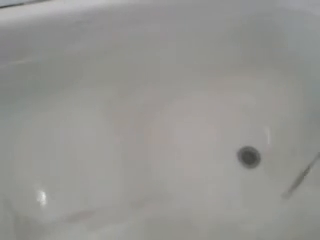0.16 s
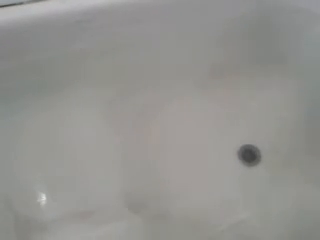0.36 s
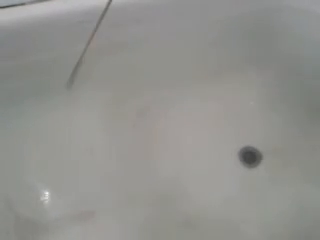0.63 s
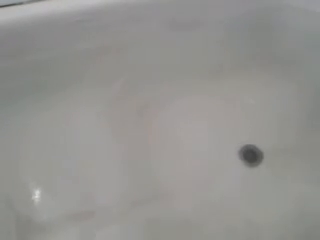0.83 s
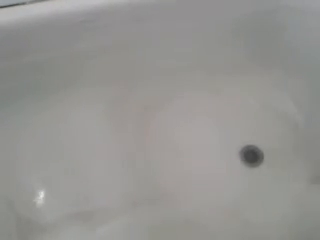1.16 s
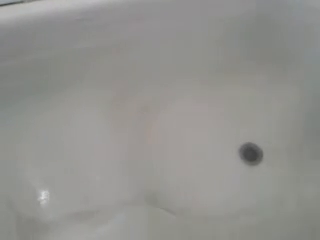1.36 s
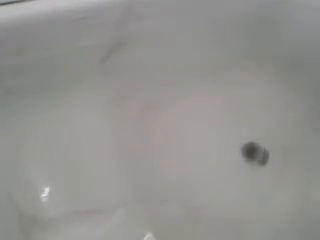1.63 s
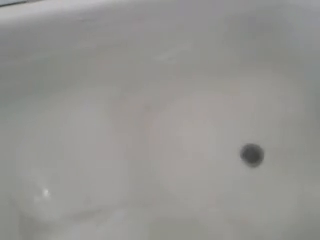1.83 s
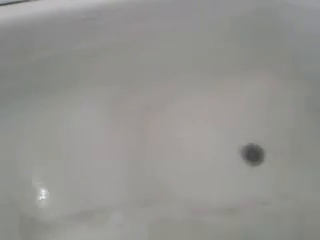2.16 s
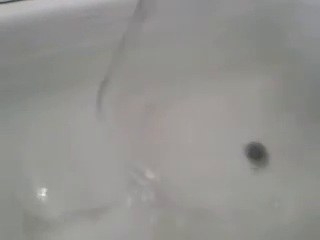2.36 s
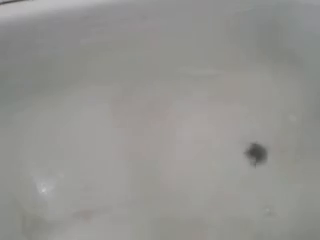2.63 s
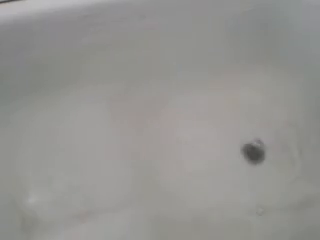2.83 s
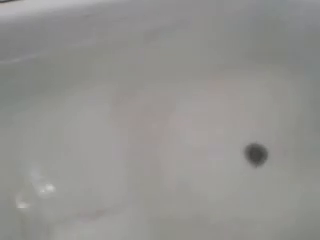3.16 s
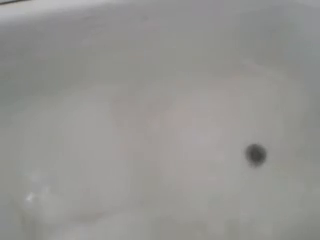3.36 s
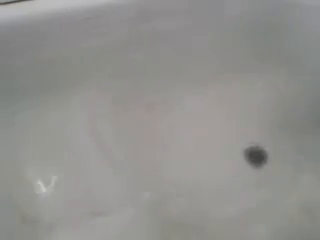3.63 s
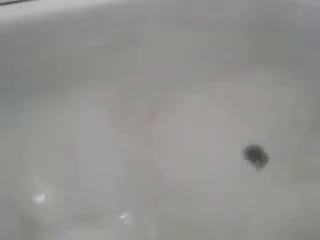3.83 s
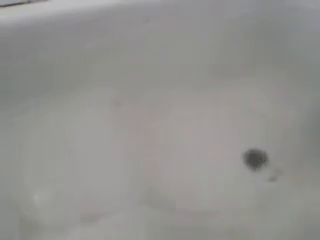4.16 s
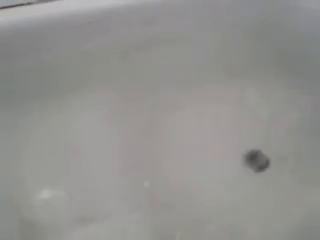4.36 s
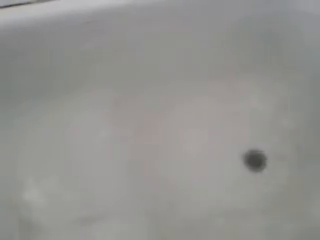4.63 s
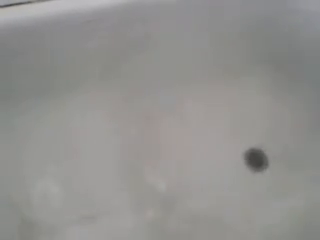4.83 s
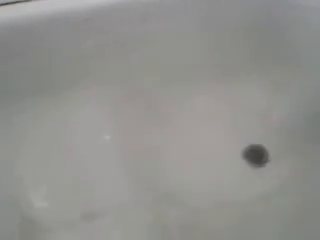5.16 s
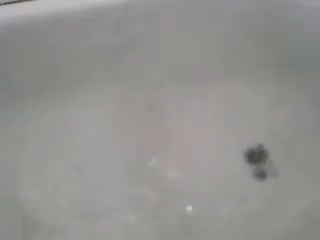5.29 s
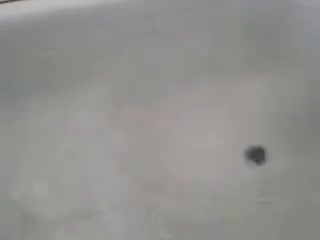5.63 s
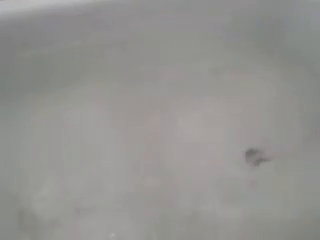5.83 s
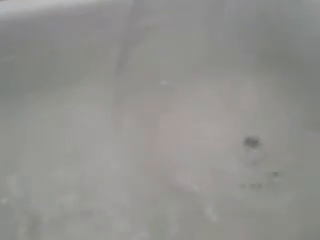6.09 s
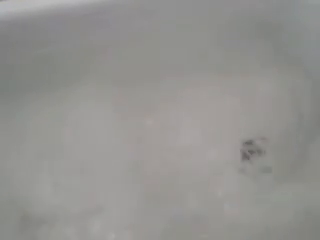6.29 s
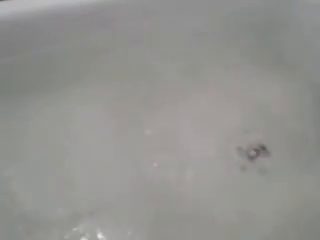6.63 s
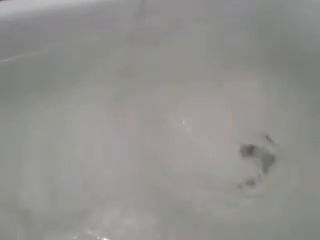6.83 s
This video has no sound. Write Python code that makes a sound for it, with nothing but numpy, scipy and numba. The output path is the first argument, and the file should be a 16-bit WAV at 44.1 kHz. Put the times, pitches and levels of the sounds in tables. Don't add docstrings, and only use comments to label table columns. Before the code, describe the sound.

Almost still bath water at first: sparse high ticks, a low hum through the tub and two short rattly knocks. After about three seconds the drops come more thickly, crisp and bubbly, and by five seconds they become busy splashing with hollow plops and rising gulps. It stays lively to the end. Short hard tub echoes and a tiled-room tail surround it, caught close by a thin, hissy little microphone.

```python
import sys
import numpy as np
from scipy import signal
from scipy.fft import rfft, irfft, next_fast_len
from scipy.io import wavfile
from numba import njit

SR = 44100
rng = np.random.default_rng(int(sys.argv[2]) if len(sys.argv) > 2 else 0)


def store_wav(level_fs):
    pcm = np.round(np.clip(np.atleast_2d(level_fs), -1, 1) * 32767)
    wavfile.write(sys.argv[1], SR, pcm.T.astype(np.int16))


def invert_db(level):
    return 10 ** (np.asarray(level, dtype=float) / 20)


N = 307377

# (time [s], peak level [dB], level of the low thud [dB])
KNOCKS = [
    (.02, -80, -59.5),
    (0.446, -29.5, -52.5),
    (0.691, -26.5, -48.5),
]
# (time [s], stirring level [dB])
STIR = [(0, -68.5), (1.9, -63.5), (2.21, -54.5), (2.45, -64), (3.11, -58.5), (3.7, -47), (3.94, -52),
        (4.2, -44.5), (4.52, -50), (4.72, -43.5), (5.05, -42), (5.279, -36.5), (5.45, -46), (5.589, -38.5),
        (5.92, -45), (6.4, -39), (6.7, -42), (6.97, -36)]


def level(x, db):
    return x * invert_db(db) / np.sqrt(np.mean(x ** 2))


def band(x, lo_hz, hi_hz, order=2):
    return signal.sosfilt(signal.butter(order, [lo_hz, hi_hz], "bandpass", fs=SR, output="sos"), x)


def ring(x, modes, widen=1):
    out = 0
    for hz, width, db in modes:
        b, a = signal.iirpeak(hz, hz / width / widen, fs=SR)
        out = out + invert_db(db) * np.sqrt(50 / width) * signal.lfilter(b, a, x)
    return out


def over_time(curve):
    s, db = np.transpose(curve)
    return np.interp(np.arange(N) / SR, s, db)


@njit
def bubbles(start, hz, fade_s, size, glide, rise, n):
    out = np.zeros(n)
    for e in range(len(start)):
        phase, first, step = 0., int(start[e] * SR), 1 / (fade_s[e] * SR)
        gain, loss = size[e], np.exp(-step)
        for i in range(min(int(5 / step), n - first)):
            age = i * step
            phase += 2 * np.pi * hz[e] * (1 + glide[e] * age) / SR
            gain *= loss
            out[first + i] += gain * (1 - np.exp(-rise * age)) * np.sin(phase)
    return out


def drops(table, cycles, glide, trim_db, crowd_db, spread_s, rise):
    s, db, hz = np.transpose(table)
    luck = rng.random((len(s), 11)).T
    fade_s = cycles * (0.59 + 0.7 * luck[0]) / hz
    out = bubbles(s, hz, fade_s, invert_db(db + trim_db), glide * luck[1], rise, N)
    for late, pitch, size in (luck[2:5], luck[5:8], luck[8:11]):
        near_s = s + spread_s * (late - .22)
        near_hz = np.minimum(hz * 2 ** (.7 * pitch - .19), 7600)
        near_size = invert_db(db + crowd_db - 2.4 * size)
        out += bubbles(near_s, near_hz, .6 * cycles / near_hz, near_size, glide * size, rise, N)
    return out


def fine_drops():
    # (time [s], peak level [dB], pitch [Hz])
    light = [(0.0196, -33.5, 6170), (1.092, -41.5, 4380), (1.268, -41, 4700), (1.55, -45.5, 4510),
             (2.057, -38, 5700), (2.133, -33, 5640), (2.325, -35.5, 5060), (2.5706, -36.5, 6850),
             (2.7154, -33.5, 5950), (2.812, -30, 3920), (3.0764, -35, 5530), (3.1865, -28.5, 6030),
             (3.3024, -39, 4660), (3.345, -33.5, 5000), (3.4306, -36.5, 5070), (3.468, -33.5, 5630),
             (3.5483, -32.5, 7040), (3.618, -27.5, 7100), (3.6498, -31, 5360), (3.711, -23, 6440),
             (3.8382, -36.5, 6200), (3.9033, -34.5, 5600), (3.9649, -20.5, 6030), (4.0123, -34, 6860),
             (4.0564, -27.5, 5650), (4.0996, -30.5, 6340), (4.2341, -25, 5590), (4.3122, -28.5, 4840),
             (4.4004, -36.5, 5500), (4.4366, -31.5, 6030),
             (0.451, -47, 6000), (0.6913, -41, 5950), (2.579, -36, 6900), (2.592, -39, 6400),
                (2.739, -42, 6570), (3.052, -40, 6760), (3.1113, -38.5, 4780), (3.1218, -41.5, 3010),
                (3.135, -38.5, 6100), (3.3707, -35.5, 4900), (4.48, -34.5, 6520), (4.8406, -30.5, 6300),
                (5.0694, -31, 6260), (5.197, -25.5, 6730), (5.227, -28.5, 5670), (5.313, -29, 4900),
                (5.3902, -30, 5770), (5.515, -32.5, 4700), (5.625, -31.5, 5040), (5.664, -37.5, 5580),
                (5.807, -29, 6170), (6.0127, -28, 4700), (6.1255, -30, 6100), (6.1654, -33, 6800),
                (6.3024, -26, 5370), (6.4724, -28, 5440), (6.5145, -27.5, 5600), (6.7082, -30, 5720),
                (6.782, -32.5, 6000), (6.7988, -31, 4630)]
    spatters = [(4.5503, -22.5, 6280), (4.572, -17.5, 5860), (4.642, -20.5, 5150), (4.7372, -23.5, 5960),
                (4.795, -26, 6430), (4.8726, -27, 5380), (4.9287, -21, 6450), (5.024, -35, 6200),
                (5.1248, -18.5, 5920), (5.149, -28.5, 5540), (5.179, -24.5, 6730), (5.2614, -22.5, 6260),
                (5.3439, -24, 6200), (5.4157, -22, 4780), (5.4928, -28.5, 6100), (5.5604, -22.5, 4530),
                (5.7187, -25.5, 5930), (5.847, -15, 6200), (5.9674, -21.5, 5470), (5.9944, -21.5, 6800),
                (6.0332, -15.5, 6400), (6.1836, -24.5, 6440), (6.2345, -16, 4440), (6.2667, -19, 6150),
                (6.336, -26, 5160), (6.3525, -11.5, 6700), (6.3888, -19.5, 6600), (6.422, -29.5, 5370),
                (6.5942, -18, 5210), (6.6457, -24.5, 5950)]
    ticks = drops(light, cycles=7.1, glide=0.027, trim_db=3.2, crowd_db=2.2,
                  spread_s=0.007, rise=1.19)
    return ticks + drops(spatters, cycles=4.8, glide=0.021, trim_db=6.5, crowd_db=4.5,
                         spread_s=0.007, rise=1.0)


def plinks():
    # (time [s], peak level [dB], pitch [Hz])
    middling = [(1.5508, -42.5, 3880), (2.085, -44, 2600), (2.1382, -38.5, 4030), (2.2784, -42, 3150),
                (2.5687, -43, 3040), (2.8238, -28.5, 3730), (3.0817, -39.5, 3520), (3.4953, -47, 4180),
                (3.699, -38.5, 3260), (3.8854, -44.5, 3070), (4.1674, -42, 2550), (4.5843, -41, 2670),
                (4.6442, -31.5, 3200), (4.6766, -29, 3820), (4.7363, -31, 3280), (5.1463, -27.5, 3530),
                (5.1823, -35.5, 2490), (5.2618, -31, 4000), (5.5158, -29.5, 4040), (5.6568, -29, 3000),
                (5.7058, -34, 3400), (5.8049, -24.5, 3640), (5.851, -25, 2680), (6.0336, -20.5, 2860),
                (6.2712, -31, 2970), (6.3369, -29.5, 2860), (6.3935, -25.5, 4120), (6.5943, -29.5, 3980),
                (6.8435, -31.5, 3120), (6.941, -24, 3550)]
    return drops(middling, cycles=9.1, glide=0.073, trim_db=1.5, crowd_db=-0.8, spread_s=0.01, rise=8.4)


def plops():
    # (time [s], peak level [dB], pitch [Hz])
    mixed = [(0.886, -45, 1500), (1.093, -40, 1920), (1.319, -42, 2050), (2.045, -48, 1380),
             (2.186, -37, 1230), (2.409, -44.5, 1735), (2.81, -37.5, 1915), (2.865, -40, 1524),
             (3.181, -41, 1480), (3.729, -42, 1102), (4.125, -34, 2060), (4.289, -45, 1504),
             (4.488, -42.5, 1200), (4.548, -41.5, 888), (4.577, -36, 2220), (4.645, -41.5, 1416),
             (5.188, -37, 2260), (5.357, -28.5, 1050), (5.491, -27, 1576), (5.625, -41, 2110),
             (5.719, -29.5, 1622), (5.797, -25, 1397), (5.84, -34, 2140), (6.012, -41, 1020),
             (6.238, -28, 2287), (6.356, -27, 2290), (6.435, -45, 860), (6.595, -32, 2070),
             (6.663, -30, 1250), (6.844, -27, 1896),
             (.022, -45, 2400), (.6, -46, 2960), (1.16, -39.5, 6970), (1.23, -39, 7140),
              (1.55, -51.5, 900), (1.79, -54.5, 640), (2.19, -36, 1774), (2.21, -34.5, 2500),
              (2.402, -40, 5540), (2.6517, -40, 4860), (2.806, -31, 4950), (2.821, -30.5, 6760),
              (4.33, -31.5, 6630), (4.5025, -31.5, 6000), (4.588, -26, 5730), (4.657, -22, 5500),
              (5.23, -51, 357), (5.5, -38.5, 779), (5.509, -53, 366), (5.753, -38, 1360),
              (5.841, -20, 6560), (6.034, -20, 3800), (6.11, -26, 1830), (6.226, -23, 5000),
              (6.238, -16, 6260), (6.513, -39, 1210), (6.555, -43, 1300), (6.759, -44.5, 785),
              (6.873, -25.5, 4900), (6.91, -45.5, 2100),
             (0.023, -50, 975), (0.171, -52, 1183), (1.231, -47.5, 2500), (2.832, -44.5, 1630),
               (3.111, -50.5, 1570), (3.3616, -41.5, 2600), (3.475, -48.5, 1680), (3.545, -55, 1560),
               (3.704, -50, 1890), (3.815, -53, 1700), (4.326, -43.5, 1850), (4.377, -44, 1710),
               (4.427, -48, 1870), (4.127, -45.5, 1270), (4.7793, -30.5, 4100), (4.8592, -38, 2470),
               (4.9603, -36, 3600), (5.223, -36.5, 2900), (5.238, -40, 2270), (5.272, -43.5, 1420),
               (5.391, -31.5, 3030), (5.446, -42, 990), (5.488, -32.5, 2580), (5.89, -32, 1340),
               (5.9977, -28, 2550), (6.4437, -28.5, 4240), (6.515, -29.5, 3620), (6.661, -49, 1455),
               (6.8268, -27.5, 2600), (6.95, -39.5, 1270)]
    return drops(mixed, cycles=9.2, glide=0.076, trim_db=-2.0, crowd_db=-5.5,
                 spread_s=0.018, rise=6.5)


def risers():
    # (time [s], peak level [dB], start pitch [Hz], end pitch [Hz], length [s])
    sliding = [
        (2.205, -42, 1350, 2820, 0.02),
        (5.997, -39, 1200, 960, 0.045),
        (5.355, -33.5, 1030, 2050, 0.047),
        (5.888, -31.5, 1230, 2550, 0.032),
        (6.109, -31, 866, 1900, 0.038),
        (6.635, -31.5, 843, 2220, 0.056),
        (6.434, -45, 820, 1100, 0.06),
        (6.685, -48, 1900, 3000, 0.022),
        (6.554, -40, 1120, 950, 0.04),
    ]
    out = np.zeros(N)
    for s, db, hz, end_hz, length in sliding:
        age = np.arange(int(length * SR)) / (length * SR)
        pitch = hz + (end_hz - hz) * age ** 2.2
        shape = np.minimum(age / .06, 1) * np.exp(-1.1 * age) * np.minimum((1 - age) / 0.087, 1)
        out[int(s * SR):][:len(age)] += invert_db(db) * shape * np.sin(2 * np.pi * np.cumsum(pitch) / SR)
    return out


def more_bubbles():
    # (time [s], peak level [dB], pitch [Hz])
    scattered = [(3.197, -47, 3880), (3.3615, -46, 3990), (3.596, -50, 4270), (3.65, -44, 3190),
                 (4.048, -48, 3630), (4.0943, -42, 4140), (4.195, -43, 3420), (4.234, -46, 3200),
                 (4.3288, -40, 3710), (4.3906, -45, 4100), (4.665, -35, 3290), (5.0002, -44, 3050),
                 (5.0491, -42, 3060), (5.101, -38, 3460), (5.1243, -33, 3890), (5.315, -41, 1120),
                 (5.3503, -36, 3670), (5.352, -40, 2100), (5.4725, -41, 3050), (5.503, -33, 1660),
                 (5.6251, -37, 3920), (5.686, -47, 2040), (5.765, -47, 960), (5.7713, -39, 3030),
                 (5.965, -42, 1660), (6.1085, -35, 3160), (6.175, -40, 950), (6.234, -37, 1600),
                 (6.265, -42, 1350), (6.418, -41, 996), (6.435, -42, 1500), (6.475, -42, 1300),
                 (6.5545, -39, 2820), (6.61, -36, 2100), (6.6603, -35, 3380), (6.7022, -40, 4380),
                 (6.799, -39, 2430), (6.95, -37, 2170), (4.275, -38, 5500), (4.345, -36, 6900),
                 (4.37, -38, 5300), (4.42, -38, 4750), (4.455, -35, 6300), (4.115, -36, 6500),
                 (4.165, -40, 4200), (4.305, -38, 5300), (5.925, -36, 6200), (5.855, -24, 5200),
                 (6.15, -36, 5500), (6.375, -30, 5800), (2.23, -44, 1500), (2.9, -47, 1500), (2.95, -49, 1400),
                 (4.16, -43, 2100), (5.05, -46, 2000), (6.51, -41, 1700), (6.53, -42, 1150), (6.59, -41, 1050),
                 (6.72, -42, 900), (6.9, -39, 2300)]
    return bathroom(drops(scattered, cycles=9.5, glide=0.06, trim_db=-1.5, crowd_db=-6, spread_s=0.012, rise=4.5))


def patter(curve_db, lo_hz, hi_hz, cycles, scatter_db, trim_db, count):
    luck = rng.random((count, 3)).T
    s = luck[0] * N / SR
    hz = lo_hz + (hi_hz - lo_hz) * luck[1]
    size = invert_db(scatter_db * np.minimum(-np.log(1 - luck[2]), 3.5))
    grains = bubbles(s, hz, cycles / hz, size, 0.071 * luck[2], 5.1, N)
    return level(grains, trim_db) * invert_db(curve_db)


def spray():
    spray_db = over_time(STIR)
    drip_db = -52.5 + 0.77 * (spray_db + 49.5)
    mist = patter(spray_db, 2650.0, 7700., cycles=7.5, scatter_db=6.0, trim_db=-11.0, count=9000)
    return mist + patter(drip_db, 4400., 7300., cycles=15.0, scatter_db=4.5, trim_db=-7.5, count=1200)


def ripples():
    # (time [s], ripple level [dB])
    slosh = [(0, -69), (2.5, -64), (3.1, -60.5), (3.9, -59), (4.3, -55), (4.75, -58.5), (5.15, -69),
             (5.35, -41.5), (5.9, -68.5), (6.25, -40.5), (6.7, -54), (6.97, -39)]
    return patter(over_time(slosh), 1320., 2245.0, cycles=7.0, scatter_db=3.5, trim_db=-11, count=700)


def reel():
    # (pitch [Hz], width [Hz], level [dB])
    modes = [(1750, 32, -15), (2310, 59, -11), (2680, 51, -6), (2860, 26, -6), (3410, 31, -3),
             (3800, 38, 0), (4040, 43, -1), (4570, 30, -13), (5240, 63, -13), (5420, 42, -13),
             (5950, 200, -6), (6470, 30, -9)]
    age, out = np.arange(SR // 2) / SR, np.zeros(N)
    for s, db, thud_db in KNOCKS:
        push = rng.standard_normal(len(age))
        clack = level(ring(push, modes, widen=1.35), 0.6) + level(band(push, 2070, 7000), -6.5)
        clack *= invert_db(db - 10.5) * np.minimum(age / 0.0029, 1) * np.exp(-(age / 0.067) ** 1.43)
        thud = invert_db(thud_db) * level(band(push, 360, 1100), 0)
        thud *= np.minimum(age / 0.037, 1) * np.exp(-age / 0.1)
        out[int(s * SR):][:len(age)] += clack + thud
    return out


def tub():
    # (pitch [Hz], width [Hz], level [dB])
    modes = [
        (267.2, 8.8, -1.5),
        (371, 42, -3.5),
        (620, 120, -7),
    ]
    settles_s, hum_db, after_db, swell_db, t60_s = 0.79, -52.5, -58, 3.5, 0.56
    t = np.arange(N) / SR
    hum = invert_db(np.interp(t - settles_s, [0, .15, 3.5], [hum_db, after_db, after_db - 13]))
    for s, _, thud_db in KNOCKS:
        age = np.maximum(t - s, 0)
        hum = hum + invert_db(thud_db + swell_db - 60 * age / t60_s) * np.minimum(age / 0.036, 1)
    return level(ring(rng.standard_normal(N), modes), -13.5) * hum


def bathroom(x):
    tub_fade_s, tub_db, tiles_t60_s, tiles_db = 0.02, -6.5, 0.35, -8.5
    t = np.arange(SR // 2) / SR
    walls = rng.standard_normal((2, len(t))) * np.minimum(t / 0.00057, 1)
    near = band(walls[0], 110, 6800, order=1) * np.exp(-t / tub_fade_s)
    tiles = band(walls[1], 130, 3800, order=1) * invert_db(-60 * t / tiles_t60_s)
    echo = invert_db(tub_db) * near / np.linalg.norm(near) + invert_db(tiles_db) * tiles / np.linalg.norm(tiles)
    return x + signal.fftconvolve(x, echo)[:N]


def handling():
    # (time [s], peak level [dB], pitch [Hz])
    bumps = [
        (0.446, -70, 97),
        (4.1, -62, 88),
        (4.65, -63, 88.5),
    ]
    s, db, hz = np.transpose(bumps)
    drift = level(band(rng.standard_normal(N), 10, 45), -86.5)
    return bubbles(s, hz, 3.4 / hz, invert_db(db), 0 * s, 0.93, N) + drift


def air():
    # (pitch [Hz], level [dB per Hz])
    hiss = [(35, -45.5), (60, -11), (104, -26), (266, -0.5), (730, 2), (1160, -1), (1420, -0.5),
            (2760, -5.5), (6050, -8), (6830, -7), (7400, -9), (9620, -65), (16300, -120)]
    hz, db = np.transpose(hiss)
    size = next_fast_len(N)
    bins = np.maximum(np.arange(size // 2 + 1) * SR / size, 1)
    colour = invert_db(np.interp(np.log(bins), np.log(hz), db))
    return level(irfft(rfft(rng.standard_normal(size)) * colour, size)[:N], -62)


def scene():
    ticks = fine_drops()
    water = ticks + plinks() + plops() + risers() + spray() + ripples()
    close = invert_db(-7) * ticks
    bass_cut = signal.butter(4, 250, "highpass", fs=SR, output="sos")
    heard = signal.sosfilt(bass_cut, bathroom(water) + close + reel() + tub())
    return (heard + more_bubbles() + handling() + air())[None]


def top_cut(x):
    return signal.sosfilt(signal.butter(12, 9580, fs=SR, output="sos"), x)


def record(dry):
    sensor_hz, top_hz, offset = 16000, 7030, .0011
    x = signal.sosfilt(signal.cheby1(11, .5, top_hz, fs=SR, output="sos"), dry)
    mirror = band(dry * np.cos(2 * np.pi * sensor_hz * np.arange(N) / SR), 8380, 9000, order=4)
    closing = np.minimum(np.arange(N)[::-1] / (.003 * SR), 1)
    return top_cut(closing * (x + invert_db(-30) * mirror) + offset)


dry = scene()
out = record(dry)
store_wav(out)
```